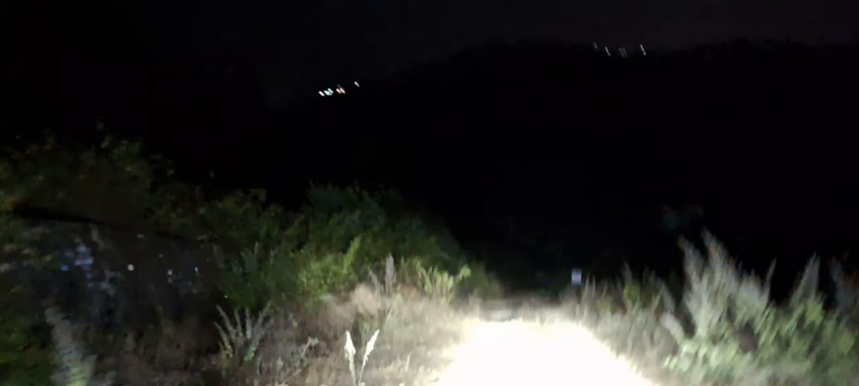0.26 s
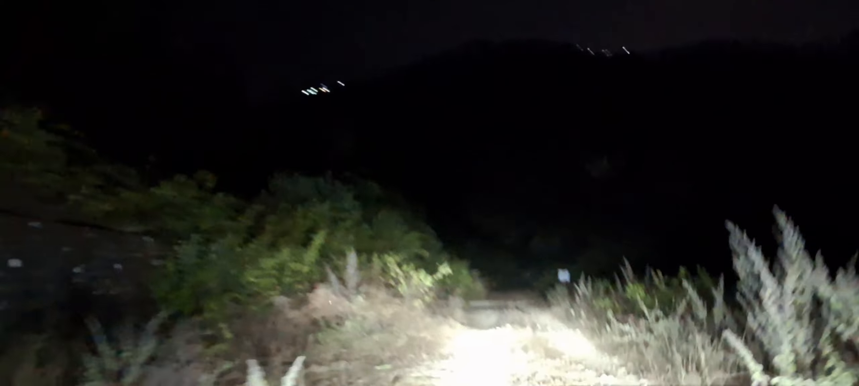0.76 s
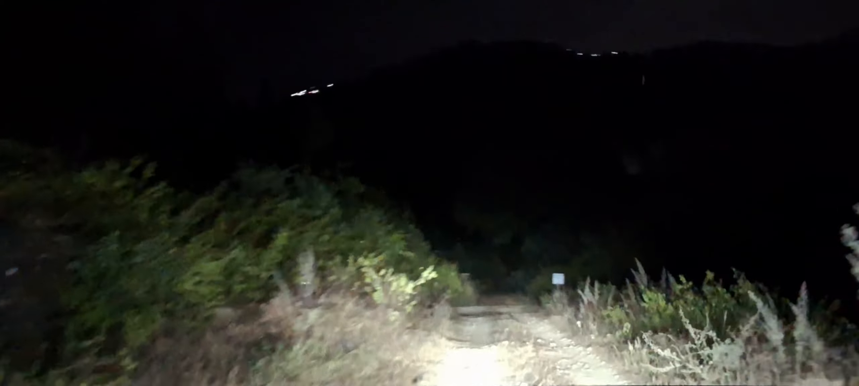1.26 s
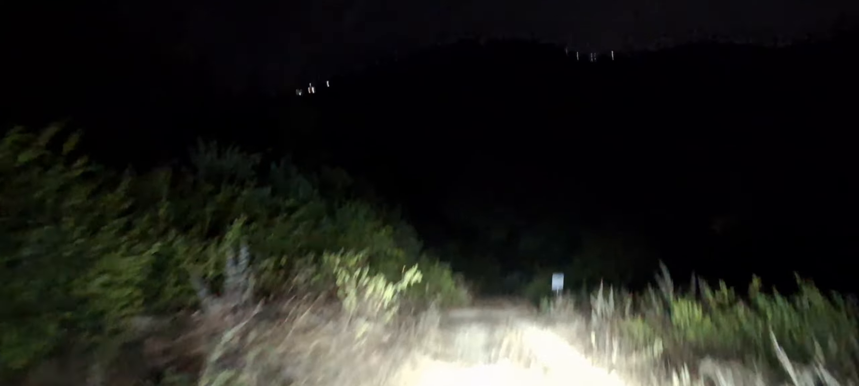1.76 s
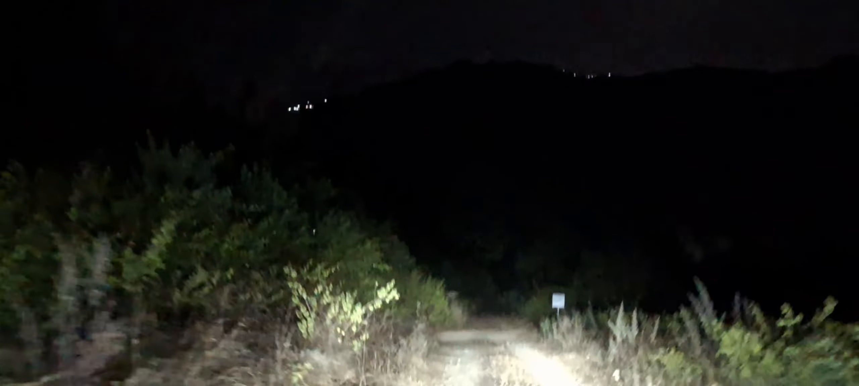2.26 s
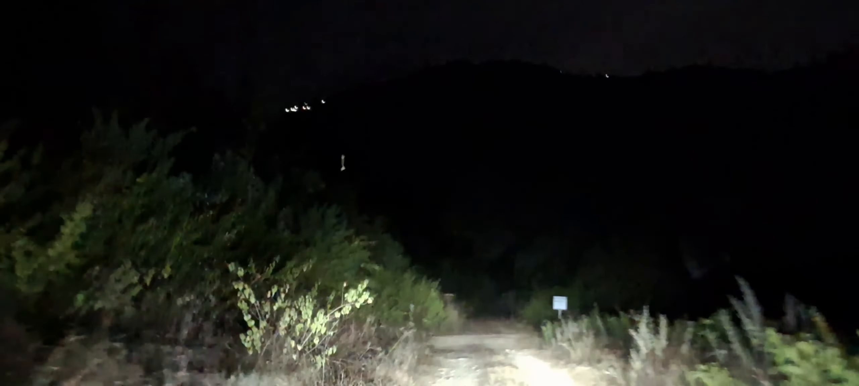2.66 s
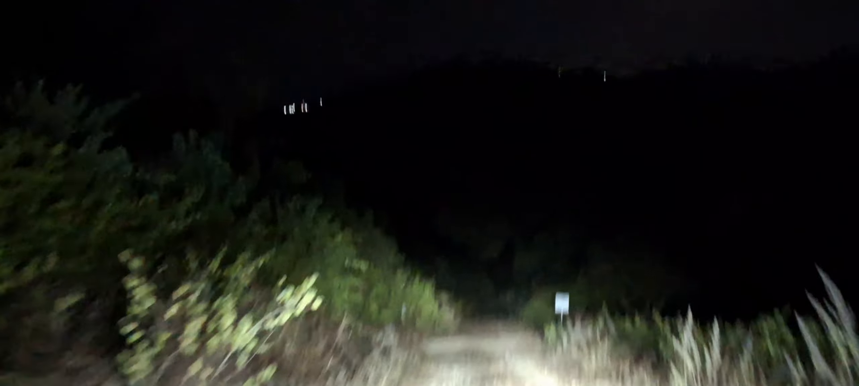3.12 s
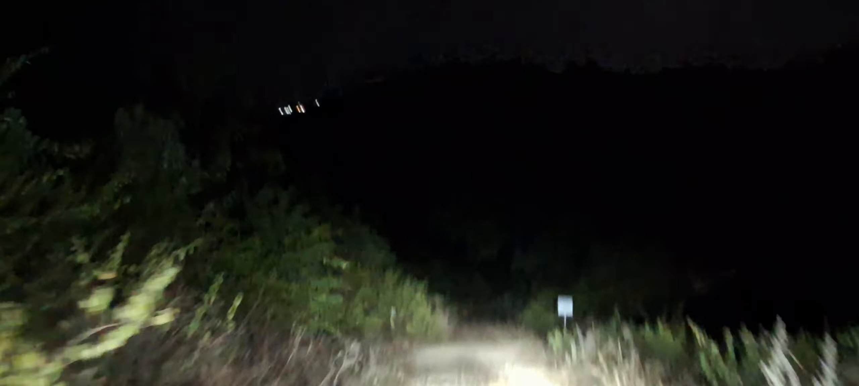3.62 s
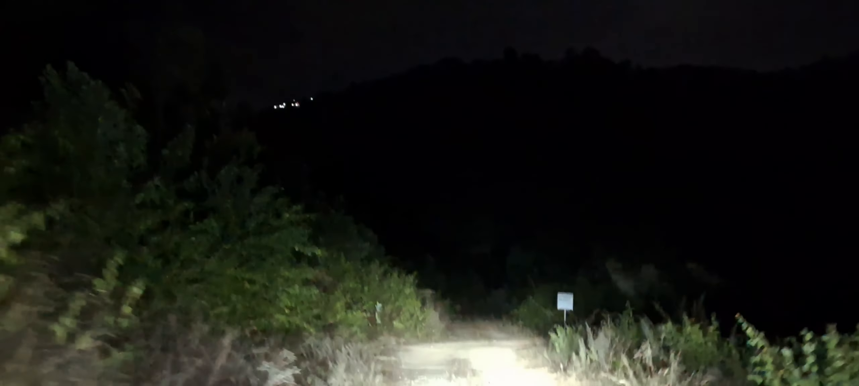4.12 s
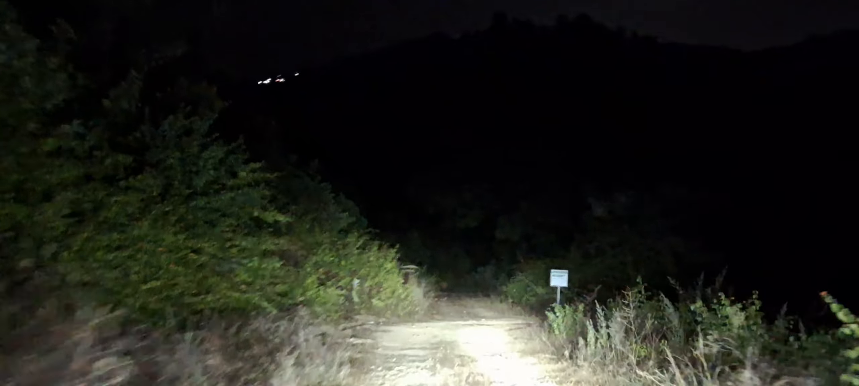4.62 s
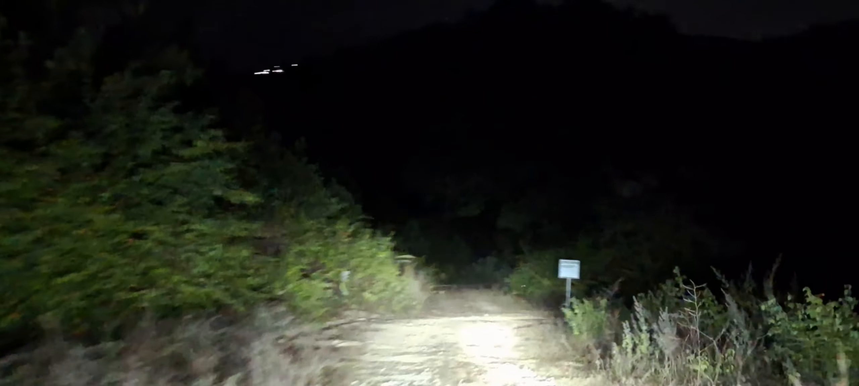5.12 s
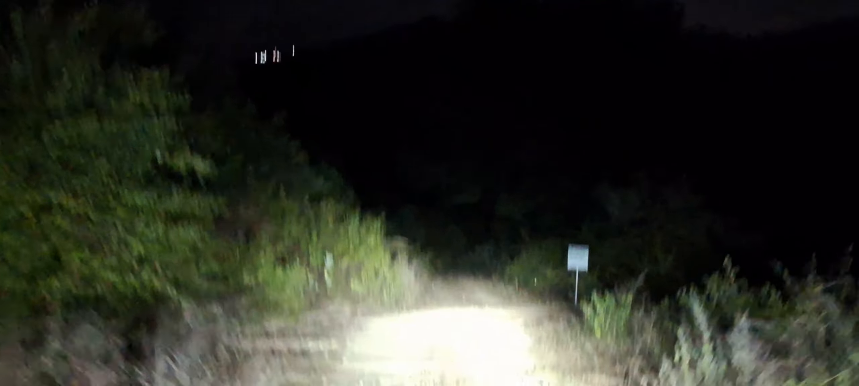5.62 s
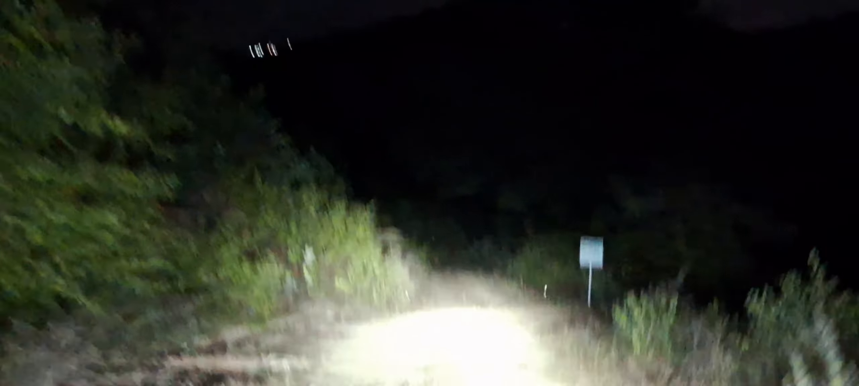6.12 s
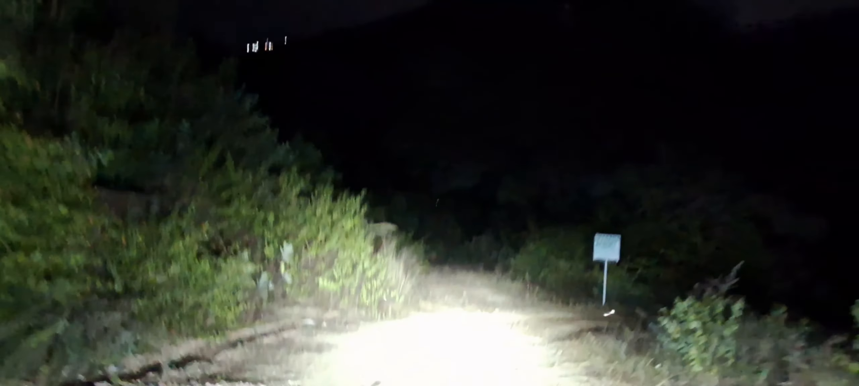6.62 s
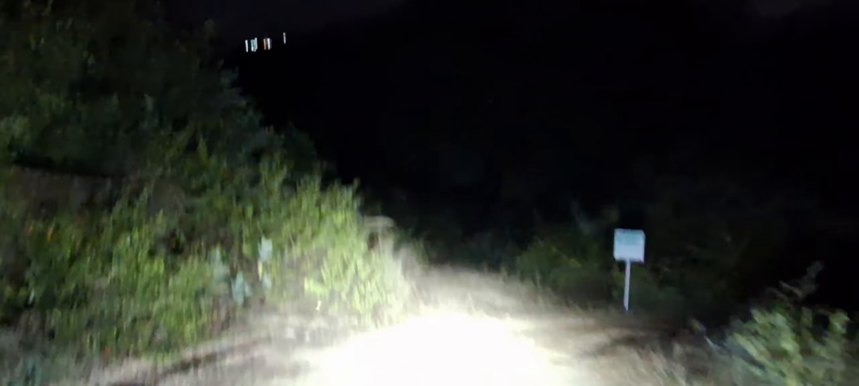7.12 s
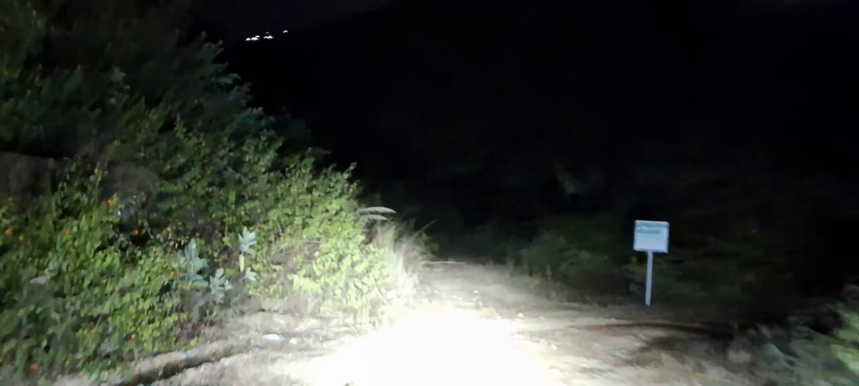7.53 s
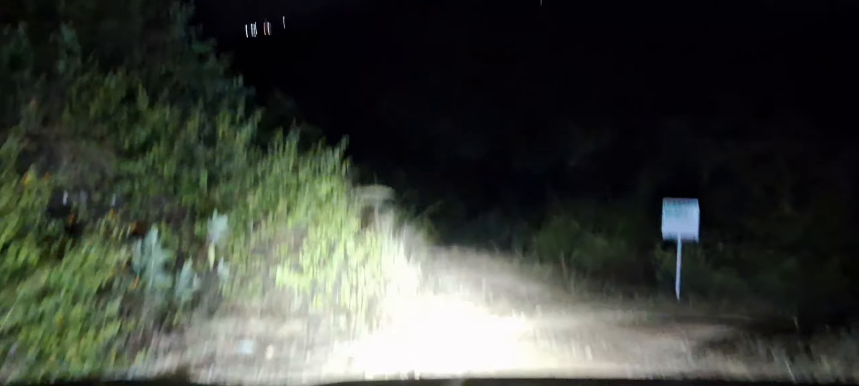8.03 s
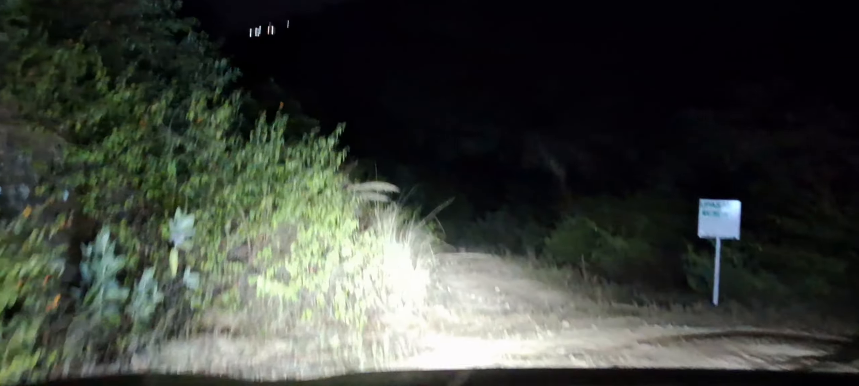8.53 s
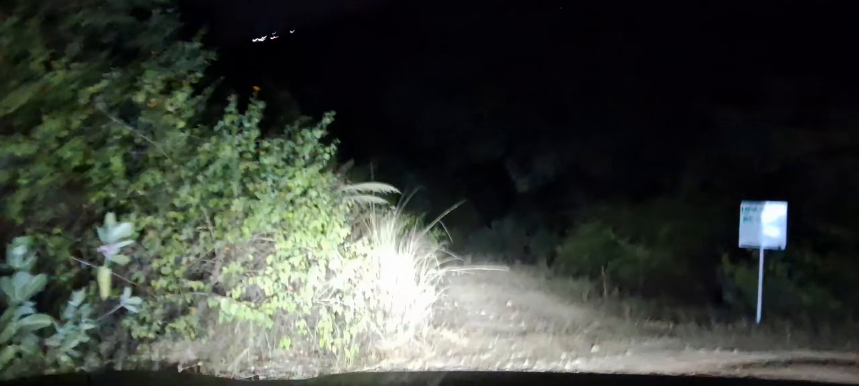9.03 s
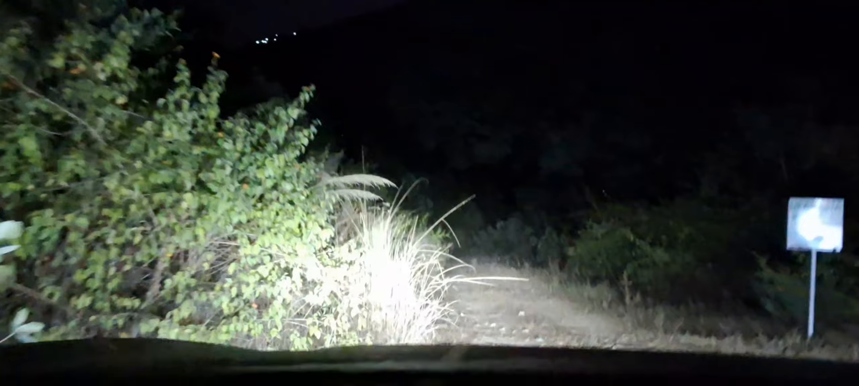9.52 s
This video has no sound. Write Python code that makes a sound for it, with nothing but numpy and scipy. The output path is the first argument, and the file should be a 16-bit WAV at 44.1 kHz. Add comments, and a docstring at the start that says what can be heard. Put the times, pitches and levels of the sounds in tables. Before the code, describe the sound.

Heard inside a car driving slowly over a stony dirt track. A deep, bumpy rumble of tyres and booming cabin air runs throughout, with rattling trim, knocking panels and pinging pebbles. Just after one second a stone scrapes and bangs hard underneath with a short ringing thud. Near eight seconds the car slows and the rumble eases; small metal chinks on the right finish it. Close stereo cabin microphones, bass centred.

```python
"""Inside a car crawling over a rough dirt track. From the start stones under the tyres excite resonances: axles thrum,
tyres drone, the cabin air booms, panels and roof drum, trim buzzes and rattles, pebbles ping and grit hisses.
Just after one second a stone scrapes and bangs along the underbody while the floor pan rings, falling in pitch.
The car slows near the end and the rolling sound eases; last, something small and metallic chinks on the right.
Two microphone ports a hand apart hear the bass alike and the treble with a small delay."""
import sys
import numpy as np
from scipy import signal
from scipy.fft import rfft, irfft, next_fast_len
from scipy.io import wavfile
from scipy.ndimage import uniform_filter1d, minimum_filter1d, map_coordinates

SR = 44100
rng = np.random.default_rng(int(sys.argv[2]) if len(sys.argv) > 2 else 0)


def transcribe(signal):
    """Save signal, clipped to [-1, 1], as a 16-bit WAV file at the path in sys.argv[1]."""
    frames = np.atleast_2d(signal).T
    limited = np.clip(frames, -1, 1)
    pcm = np.round(limited * 32767).astype(np.int16)
    wavfile.write(sys.argv[1], SR, pcm)


N = 430857

# low body sounds: (time [s], centre of the wandering boom noise [Hz, only its ratio to the mean counts],
# tyre drone level [dB], roof drumming level [dB])
BODY_SOUNDS = [(0.0, 118.3, -25, -31.5), (0.4, 121.9, -23, -24.5), (0.8, 122.5, -24.5, -28.5),
               (1.2, 120.9, -25.5, -28.5), (1.6, 119.8, -25, -23.5), (2.0, 119.3, -22.5, -32.5),
               (2.4, 124.2, -25.0, -26.5), (2.8, 119.1, -25.5, -27.5), (3.2, 125.6, -29, -30.5),
               (3.6, 122.3, -27.5, -32), (4.0, 123.2, -26.5, -29.5), (4.4, 124.9, -26, -27.9),
               (4.8, 121.3, -27.1, -29.5), (5.2, 117.6, -26, -33), (5.6, 122.8, -29, -27),
               (6.0, 121.2, -28.5, -30), (6.4, 123.2, -27.5, -30.5), (6.8, 121.6, -24, -28.5),
               (7.2, 121.4, -23, -29.0), (7.6, 120.8, -27.5, -31), (8.0, 124.9, -30, -33),
               (8.4, 120, -28.5, -37), (8.8, 120.5, -33, -40), (9.2, 121.2, -32.5, -37.5),
               (9.77, 120.4, -34, -41)]
# floor and door panel resonances: (frequency [Hz], bandwidth [Hz], level [dB])
PANEL_MODES = [(206.5, 28, 0), (275.2, 21.5, 2), (358.8, 40, -2), (470, 51.5, -5), (498, 78, -9.5),
               (703, 91, -14), (912, 110, -17), (1140, 100, -25.5)]
# colour of the loose trim: (frequency [Hz], spectral level [dB per Hz])
TRIM_COLOUR = [(710, -30), (1200, 4.5), (1410, -0.5), (1700, 0), (1880, -4), (2150, -2.5), (2910, -8),
               (4990, -13), (5850, -12), (7290, -21), (8200, -35), (9000, -43), (11700, -60.5),
               (19800, -120)]
# colour of grit on the body: (frequency [Hz], spectral level [dB per Hz])
GRIT_COLOUR = [(5000, -48.5), (8500, -11.5), (11400, -2), (13700, -2), (15700, -5)]


def amp(db):
    """Amplitude ratio from decibels."""
    return 10 ** (np.asarray(db) / 20)


def unit(x):
    """Normalises a signal to rms 1."""
    return x / np.sqrt(np.mean(x ** 2) + 1e-20)


def along(points, hz):
    """Interpolates (frequency, value) points on a logarithmic frequency axis."""
    f, v = np.transpose(points)
    return np.interp(np.log(hz + 1), np.log(f + 1), v)


def curves(rows):
    """Interpolates each column after the time linearly to one value per sample."""
    s, *cols = np.transpose(rows)
    return [np.interp(np.arange(N) / SR, s, c) for c in cols]


def swells(rows):
    """Superposes Gaussian swells, one for each bump, into one dB curve for each rise column."""
    s, length, *rises = np.transpose(rows)
    t = np.arange(0, N / SR + .01, .005)
    shape = np.exp(-4 * ((t[:, None] - s) / length) ** 2)
    return [np.interp(np.arange(N) / SR, t, shape @ rise) for rise in rises]


def wobble(rate):
    """A smooth random curve: a spline through normal deviates, rate knots a second."""
    knots = rng.standard_normal(int(N * rate / SR) + 4)
    return map_coordinates(knots, [np.arange(N) * rate / SR])


def filtered(x, response):
    """Linear filtering: the spectrum times a complex frequency response."""
    m = next_fast_len(N + SR // 2)
    return irfft(rfft(x, m) * response(np.fft.rfftfreq(m, 1 / SR)), m)[..., :N]


def modes(table):
    """Modal superposition: second-order resonances side by side, neighbours in opposite phase."""
    return lambda f: sum((-1) ** k * amp(db) * 1j * f * w / (c * c - f * f + 1j * f * w)
                         for k, (c, w, db) in enumerate(table))


def highpass(f, hz):
    """Smooth fourth-power roll-off towards the bass."""
    return 1 / (1 + (hz / (f + 1)) ** 4)


def lowpass(f, hz, power=4):
    """Smooth roll-off towards the treble, steeper for a higher power."""
    return 1 / (1 + (f / hz) ** power)


def low_modes(table, top_hz):
    """Resonances confined to the bass between two roll-offs."""
    return lambda f: modes(table)(f) * lowpass(f, top_hz) * highpass(f, 26)


def uneven(noise, depth_db):
    """Random modulation: the noise grows louder or softer unevenly in time and frequency."""
    z = signal.stft(noise, nperseg=256)[2]
    field = uniform_filter1d(rng.standard_normal(z.shape[1:]), size=4, axis=0)
    field = uniform_filter1d(field, size=6, axis=1)
    return unit(signal.istft(z * amp(depth_db * unit(field)), nperseg=256)[1][:, :N])


def shaped(envelope, response, uneven_db=0, blows=0):
    """Source and filter: two unrelated noises under an envelope, plus blows, in a unit-power colour."""
    scale = np.sqrt(np.mean(np.abs(response(np.fft.rfftfreq(SR, 1 / SR))) ** 2))
    noise = rng.standard_normal((2, N))
    if uneven_db:
        noise = uneven(noise, uneven_db)
    return filtered(envelope * noise + blows, response) / scale


def jolts(times, gains, t60, attack_s=0.0027):
    """Impulses convolved with a fast rise and an exponential decay give an envelope."""
    kicks = np.bincount((times * SR).astype(int), gains, N)[:N]
    t = np.arange(SR // 8) / SR
    decay = amp(-60 * t / t60) * (1 - np.exp(-t / attack_s))
    return np.abs(signal.fftconvolve(kicks, decay)[:N])


def steadied(pair, share):
    """Compression: evens out part of the noise's random swells, so that the level curves set the loudness."""
    power = uniform_filter1d(uniform_filter1d(pair[0] ** 2, size=3000), size=3000)
    swell = np.sqrt(np.abs(power) + 1e-12)
    even = pair / swell ** share
    return even * np.sqrt(np.mean(pair ** 2) / np.mean(even ** 2))  # rms is kept


def trim_halves(split_hz):
    """Power-complementary crossover: the dull and bright part of the trim's colour."""
    colour = lambda f: amp(along(TRIM_COLOUR, f))
    share = lambda f: lowpass(f, split_hz, 6)
    return [lambda f: colour(f) * np.sqrt(share(f)), lambda f: colour(f) * np.sqrt(1 - share(f))]


def gravel(depth_db):
    """Random pulse train: dense small stones, a few big among many weak, crushing slowly."""
    draw = rng.random((500, 2))
    times = (np.arange(len(draw)) + draw[:, 0]) / len(draw) * (N - 1) / SR
    gains = amp(-4 * np.log(draw[:, 1] + 0.0078) + depth_db)
    return 1 + jolts(times, gains, .07, attack_s=0.0041)


def road():
    """Forced vibration: the rough track drives each part of the body through its own resonances."""
    # steady rolling, easing as the car slows, before the bumps are added: (time [s], axle thrum level [dB],
    # cabin boom level [dB], panel drumming level [dB], grit hiss level [dB])
    rolling = [(0, -20.5, -20.5, -43.5, -74.5), (.45, -20.5, -17, -37, -65), (1.4, -22, -23, -39.5, -70.5),
               (2.05, -23.5, -18, -40.5, -69.5), (2.8, -22.5, -18.5, -38, -71),
               (3.2, -24.5, -20.5, -42.5, -74.5), (3.8, -23.5, -23, -45.5, -69.5),
               (4.7, -23.5, -23, -43.5, -73.5), (5.2, -22.5, -21, -42, -75),
               (6.35, -20.5, -17, -41.5, -70.5), (6.55, -27.5, -22.5, -44.5, -72.5),
               (6.9, -23.5, -22, -46.5, -73.5), (7.9, -25.5, -25, -44.5, -78), (8.75, -31, -27, -51, -76),
               (9.15, -28, -24, -48, -78.5), (9.77, -27, -30.5, -49.5, -68)]
    # bumps, stony spots and smooth patches under the wheels:
    # (time [s], length [s], rise of the crunch [dB], rise of the boom [dB], rise of the thrum [dB])
    bumps = [(0, 0.038, 12, 13.5, 18.5), (.27, 0.1, 0.5, 2.5, 0.5), (.37, 0.054, 2.5, -3, -5.5),
             (.52, 0.046, 4, 4, 3.5), (.68, 0.083, 0.5, 6.5, -2.5), (.85, 0.1, 2, 1, -1),
             (1.07, 0.15, 3, 4, 6.5), (1.31, 0.11, 1.5, 3, -6), (1.42, 0.21, -1.5, 1.5, 0.5),
             (1.57, 0.14, 3, 4, -2), (1.85, 0.054, -2, 1.5, 3), (2.02, 0.032, 4.5, 3.5, 5),
             (2.15, 0.11, 5.5, -5.5, 0.5), (2.24, 0.032, 4.5, 0, 8), (2.3, 0.13, -1, 2.5, 5),
             (2.68, 0.18, 2.5, 3.5, -1.5), (2.92, 0.091, 2.5, -3, 5.5), (3.26, 0.14, 3, 2.5, 6.5),
             (3.45, 0.16, 4.5, 2, 1), (3.72, 0.11, 6.5, 3, 2), (3.92, 0.27, 8.5, 10, 1),
             (4.12, 0.14, 7, 6.5, -2), (4.42, 0.14, 7.5, 5, 1.5), (4.62, 0.28, 2.5, 2.5, 1),
             (4.87, 0.16, 6, 2, 2.5), (5.04, .08, 3.5, 6, 1.5), (5.38, 0.065, 5.5, -7.5, 5),
             (5.54, 0.25, 5, 3, 1), (5.88, 0.14, 0.5, 4.5, -6), (6.01, 0.038, 7, 0, 4.5),
             (6.19, 0.064, 4, -3.5, -5.5), (6.27, 0.059, 4.5, -2, -4), (6.42, 0.089, 2, 0.5, 3),
             (6.75, 0.11, 3.5, 2, 9), (6.98, 0.38, 9, 4.5, -3), (7.26, 0.089, 7, 3, -5.5),
             (7.62, 0.12, 7, 5.5, -1), (7.92, 0.043, 5, 1, 6.5), (8.18, 0.074, 0, 3.5, -1),
             (8.26, 0.092, -2, 5, -1), (8.42, 0.16, 3.5, -0.5, -1.5), (8.59, 0.29, 6, 7.5, -1),
             (9.03, 0.091, 5, 0, 3.5), (9.17, 0.12, 3, 1.5, 5.5), (9.3, 0.11, 5.5, 0.5, 5.5)]
    typical_db = -41  # drumming on an ordinary stretch
    thrum_db, boom_db, drum_db, hiss_db = curves(rolling)
    _, drone_db, roof_db = curves(BODY_SOUNDS)
    crunch_rise, boom_rise, thrum_rise = swells(bumps)
    drum_db = drum_db + crunch_rise
    rough_db = drum_db - typical_db
    shared = gravel(-12) * amp(0.48 * wobble(13))

    def stones():
        """Common and independent excitation: shared stones times some of each part's own."""
        return unit(shared * gravel(-11) * amp(1.0 * wobble(16)))

    sound = axle_thrum(thrum_db + thrum_rise) + tyre_drone(drone_db) + cabin_boom(boom_db + boom_rise)
    sound = sound + panel_drumming(drum_db, rough_db, boom_rise, stones)
    sound = sound + trim_buzz(rough_db, hiss_db, stones) + pebbles(rough_db, count=6000)
    sound = sound + roof_drumming(roof_db, crunch_rise, boom_rise)
    return sound + grit_hiss(hiss_db, crunch_rise, stones)


def axle_thrum(level_db):
    """Mass-spring resonance: noise excites the axles' low modes."""
    # (frequency [Hz], bandwidth [Hz], level [dB])
    axle_modes = [(37, 25, -10), (51.6, 10, -1), (67.3, 14, -9)]
    return amp(level_db) * steadied(shaped(0.86, low_modes(axle_modes, 140)), 0.12)


def tyre_drone(level_db):
    """Structural resonance: noise excites the tyre walls, with its random swells partly evened out."""
    # (frequency [Hz], bandwidth [Hz], level [dB])
    wall_modes = [(81, 17, 4), (93.3, 11, -2)]
    return amp(level_db - 0.5) * steadied(unit(shaped(1, low_modes(wall_modes, 190))), 0.45)


def cabin_boom(level_db):
    """Cavity resonance: noise excites the modes of the enclosed air, and the narrow noise wanders slightly."""
    # air modes before the wandering: (frequency [Hz], bandwidth [Hz], level [dB])
    air_modes = [(103.9, 42, -7.5), (117.96, 20.3, 2.5), (141.7, 14.4, -3)]
    return amp(level_db) * steadied(wandering(shaped(0.85, low_modes(air_modes, 160))), 0.25)


def wandering(pair):
    """Time warping: the boom's pitch wanders slightly, as narrow noise does by chance."""
    flutter, knots_per_s = .035, 4  # random share added to the tabled wandering
    hz = curves(BODY_SOUNDS)[0]
    at = np.cumsum(hz / hz.mean() + flutter * wobble(knots_per_s))
    return np.array([np.interp(at * (N - 1) / at[-1], np.arange(N), x) for x in pair])


def panel_drumming(drum_db, rough_db, boom_rise, stones):
    """Plate resonance: stones drum on the panels; the big floor pan, lowest, also follows the boom."""
    pan_top_hz, pan_db = 304, -40.5  # pan level on an ordinary stretch
    pan_grows, pan_boom = 1.15, 0.49  # dB gained per dB of extra drumming and of boom rise
    panels = lambda f: modes(PANEL_MODES)(f) * highpass(f, 190) * lowpass(f, 1300)
    pan = lambda f: panels(f) * lowpass(f, pan_top_hz, 6)
    pan_level = amp(pan_db + pan_grows * rough_db + pan_boom * boom_rise)
    floor = pan_level * shaped(unit(stones() ** 1.1), pan)
    return floor + amp(drum_db) * shaped(unit(stones() ** 1.3), lambda f: panels(f) - pan(f))


def trim_buzz(rough_db, hiss_db, stones):
    """Amplitude modulation: stone impacts modulate a dull and a bright noise in the loose trim."""
    dull_db, bright_db = -59, -60  # on an ordinary stretch
    dull_grows, bright_grows = 1.0, 0.67  # dB gained per dB of extra drumming
    bright_with_grit, typical_grit_db = .4, -71  # dB gained per dB of hiss above the typical
    dull, bright = trim_halves(3300)
    sound = amp(dull_db + dull_grows * rough_db) * shaped(stones(), dull, uneven_db=1.5)
    bright_db = bright_db + bright_grows * rough_db + bright_with_grit * (hiss_db - typical_grit_db)
    return sound + amp(bright_db) * shaped(stones(), bright, uneven_db=2.0)


def pebbles(rough_db, count):
    """Damped free vibration: pebbles ping on the underbody, each a short ring at its own pitch and place."""
    level_db, grows = -65, 1  # on an ordinary stretch; dB gained per dB of extra drumming
    ring_cycles = 5.5  # cycles for a fall of 20 dB
    draw, t = rng.random((count, 4)), np.arange(200) / SR
    hz = 1100 * 6.2 ** draw[:, 1:2]
    size = amp(along(TRIM_COLOUR, hz) - 3.5 * np.log(draw[:, 2:3] + .03)) * np.sqrt(hz)
    decay = amp(-60 * t * hz / (3 * ring_cycles)) * (1 - np.exp(-t * hz))
    ping = size * decay * np.sin(2 * np.pi * hz * t)
    at = ((draw[:, :1] * N).astype(int) + np.arange(len(t))).ravel()
    turn = 2 * np.pi * draw[:, 3:]  # place: how the ping divides between the two signals
    pair = [np.bincount(at, (ping * g).ravel(), N)[:N] for g in (np.cos(turn), np.sin(turn))]
    return amp(level_db + grows * rough_db) * unit(np.array(pair))


def roof_drumming(level_db, crunch_rise, boom_rise):
    """Plate resonance: noise excites two low roof modes, following the rises of crunch and boom."""
    # (frequency [Hz], bandwidth [Hz], level [dB])
    roof_modes = [(153, 13, -1), (176.4, 28.2, 1.5)]
    per_crunch, per_boom = 0.62, 0.38  # dB gained per dB of each rise
    level = amp(level_db - 2.5 + per_crunch * crunch_rise + per_boom * boom_rise)
    return level * unit(shaped(1, low_modes(roof_modes, 270)))


def grit_hiss(level_db, crunch_rise, stones):
    """Filtered noise: the hiss of grit is treble noise, with a random unevenness in time and frequency."""
    grows = 0.65  # dB gained per dB of crunch
    hiss = shaped(unit(stones() ** 1.4), lambda f: amp(along(GRIT_COLOUR, f)), uneven_db=-2.5)
    return amp(level_db + grows * crunch_rise) * hiss


def trim_rattles():
    """Transient excitation: each jolt starts a short decaying noise in the trim, dull and bright."""
    # (time [s], dull part level [dB], bright part level [dB])
    bursts = [(0.1155, -45.5, -57), (0.1501, -62, -50), (0.2634, -36, -68), (0.5165, -49, -46),
              (0.5872, -35.5, -51), (0.617, -39, -53.5), (0.75, -41.5, -44), (0.841, -37, -62),
              (1.309, -57, -43), (1.5307, -48.5, -63.5), (1.9173, -51, -44.5), (2.145, -45, -43.5),
              (2.239, -44.5, -48), (2.55, -45, -42.5), (2.601, -43, -43), (2.7127, -42.5, -61),
              (2.993, -65, -46), (3.1626, -44, -68), (3.3663, -40, -49), (3.478, -43.5, -61),
              (3.7125, -44.5, -47), (3.8254, -58.5, -43), (4.0432, -51, -59.5), (4.1017, -49, -58),
              (4.345, -43, -57), (4.3902, -57, -65), (4.6057, -43, -42.5), (4.8034, -44.5, -57),
              (4.852, -61, -60), (4.994, -45, -51), (5.238, -48.5, -74), (5.332, -52, -51),
              (5.7064, -51.5, -71), (6.005, -39, -46), (6.2697, -54.5, -45.5), (6.401, -51, -60.5),
              (6.8587, -40, -55), (6.9622, -48, -62), (6.993, -44, -65), (7.0223, -46.5, -59),
              (7.0574, -41, -47.5), (7.2497, -38.5, -57), (7.5911, -55, -60), (8.39, -63, -49.5),
              (8.8684, -69, -54), (8.972, -67, -49), (9.0124, -66, -51), (9.072, -67, -49),
              (9.3644, -51, -60), (9.3974, -59, -47), (9.5274, -66, -49.5), (9.5604, -65, -49),
              (9.698, -49, -45)]
    s, dull_db, bright_db = np.transpose(bursts)
    dull, bright = trim_halves(4600)
    low_part = shaped(jolts(s, amp(dull_db), .055, attack_s=.0025), dull)
    return low_part + shaped(jolts(s, amp(bright_db), 0.055, attack_s=0.0055), bright)


def grit_ticks():
    """Transient excitation: the loudest grit thrown against the body ticks as short treble noise."""
    # (time [s], level [dB])
    hits = [(.1166, -65.5), (.48, -57.5), (.5219, -54.5), (.616, -50), (0.9194, -63.5), (1.0837, -46.5),
            (1.27, -59), (1.528, -66.5), (1.921, -48.5), (1.987, -55.5), (2.1476, -44), (2.3261, -66.5),
            (2.992, -60), (3.377, -62), (3.463, -59.5), (3.71, -58.5), (3.7556, -53), (3.8276, -56.5),
            (3.8925, -57), (3.9612, -59.5), (4.3902, -59.5), (4.806, -50.5), (4.8543, -49.5), (5.365, -58),
            (5.4967, -54), (6.0076, -51.5), (6.8874, -55.5), (7.0634, -56), (7.251, -57)]
    s, db = np.transpose(hits)
    return shaped(jolts(s, amp(db), 0.06, attack_s=.008), lambda f: amp(along(GRIT_COLOUR, f)))


def panel_knocks():
    """Impulse response: stones and suspension knock the panels with a sharp blow and a rumble."""
    # (time [s], level [dB])
    hits = [(0.253, -23), (0.483, -45), (0.543, -45), (0.582, -26), (0.845, -25.5), (1.021, -52),
            (1.084, -19), (1.499, -33), (1.59, -30), (1.994, -40.5), (2.107, -34.5), (2.18, -33),
            (2.233, -37), (2.654, -28), (2.816, -30.5), (3.026, -36.5), (3.374, -42), (3.48, -31.5),
            (3.702, -36.5), (3.913, -36.5), (3.96, -29.5), (4.048, -41), (4.098, -34), (4.279, -41),
            (4.425, -31.5), (4.529, -42.5), (4.602, -41), (4.835, -34.5), (5.114, -51), (5.216, -35),
            (5.311, -46), (5.66, -34.5), (5.706, -32.5), (5.776, -31), (6.004, -30), (6.075, -33),
            (6.383, -34.5), (6.459, -39), (6.756, -29.5), (6.861, -29), (6.961, -33), (6.996, -29),
            (7.256, -30), (7.91, -39.5), (8.16, -36.5), (8.39, -35.5), (8.45, -46), (8.58, -38.5),
            (9.015, -38)]
    blow_db = 17  # added to the level of the one-sample blow
    s, db = np.transpose(hits)
    blow = np.bincount((s * SR).astype(int), amp(db + blow_db), N) * np.array([[1], [.5]])
    colour = lambda f: modes(PANEL_MODES)(f) * highpass(f, 450) * lowpass(f, 1500)
    return shaped(jolts(s, amp(db + 1), 0.036, attack_s=0.0014), colour, blows=blow)


def loud_pings():
    """Beating partials: each loud pebble on the underbody rings briefly at three close pitches."""
    # (time [s], level [dB], frequency [Hz])
    hits = [(.262, -37, 1460), (.262, -49, 2330), (.517, -44, 3100), (1.311, -47, 5430), (1.563, -55, 6460),
            (1.92, -53, 5770), (2.145, -55, 6120), (2.232, -48, 2800), (2.232, -57, 3960),
            (3.369, -57, 3470), (3.826, -55, 5680), (3.908, -46, 2200), (3.96, -41, 1550),
            (4.016, -56, 2200), (4.051, -49, 2250), (4.1, -49, 2190), (4.285, -47, 1550),
            (4.344, -54, 4130), (4.39, -49, 2200), (4.605, -53, 4130), (4.605, -50, 5200),
            (5.364, -58, 6290), (6.004, -49, 2240), (6.009, -54.5, 4130), (6.244, -56, 5510),
            (6.859, -57, 5940), (7.058, -54, 3960), (7.248, -56, 2670), (7.609, -54, 4220),
            (8.391, -59, 5940), (8.972, -58, 6120), (9.365, -55, 2760), (9.4, -54, 4140),
            (9.402, -54, 2800), (9.455, -65, 6000)]
    ring_cycles, spread = 40, .05  # cycles for a fall of 20 dB; relative spacing of the partials
    out, t = np.zeros((2, N + SR)), np.arange(SR // 20) / SR
    for (s, db, hz), draw in zip(hits, rng.random((len(hits), 7))):
        ring = 0
        for k in range(3):
            partial_hz = hz * (1 + spread * (k - 1 + draw[k] - .5))
            ring = ring + np.sin(2 * np.pi * partial_hz * t + draw[3 + k])
        ring = ring * amp(db - 3.5 - 60 * t * hz / (3 * ring_cycles)) * (1 - np.exp(-t / .0015))
        out[:, round(s * SR):][:, :len(t)] += ring * [[np.cos(draw[6])], [np.sin(draw[6])]]
    return out[:, :N]


def floor_pan():
    """Damped oscillation of falling pitch: the pan rings around the stone and on the roughest bumps."""
    # (time [s], level [dB], starting frequency [Hz], sag [Hz per s], decay by 60 dB [s])
    thuds = [(1.021, -30, 700, 300, 0.055), (1.034, -18.5, 352, 2154, 0.15), (1.084, -6, 374, 2450, 0.054),
             (1.086, -28, 650, 600, .04), (1.09, -27.5, 1177, 900, .04), (1.099, -21, 960, 900, 0.052),
             (3.92, -29, 284, 100, 0.13), (4.05, -25, 289, 100, 0.17), (4.109, -28.5, 288, 100, .14),
             (4.42, -30.5, 284, 100, .14)]
    t, ring = np.arange(N) / SR, 0
    for start, db, hz, sag, t60 in thuds:
        age = np.clip(t - start, 0, .1)
        swing = np.sin(2 * np.pi * (hz - sag * age / 2) * age) * (t - start < .1)
        ring = ring + amp(db - 60 * age / t60) * (1 - np.exp(-age / 0.0045)) * swing
    return ring * [[1], [0]]  # only the part that the ports share


def stone():
    """Impact excitation of a shell: a scrape, then four quick blows on the underbody, ever duller."""
    # (time [s], level [dB], length [s], treble over the body [dB])
    contacts = [(1.07, -45.5, 0.044, 5.5), (1.083, -23, 0.0067, 3), (1.09, -23, 0.0069, 2),
                (1.096, -25.5, 0.0072, -4), (1.102, -25, 0.008, -5)]
    # colour of the bang: (frequency [Hz], spectral level [dB per Hz])
    bang_colour = [(120, -26), (200, 0), (962, -14.5), (1200, -13), (1310, -30.5), (1460, -20), (2190, -21),
                   (2680, -23.5), (3100, -26), (4000, -25.5), (5980, -25.5), (8460, -45.5), (15700, -57)]
    # underbody resonances: (frequency [Hz], bandwidth [Hz], rise [dB])
    shell = [(641, 69, 1.5), (970, 66, 5.5), (1410, 80, 5.5), (2330, 130, -4), (3350, 180, 4),
             (3940, 330, 7), (5120, 250, -0.5), (5900, 300, 0.5)]
    t = np.arange(N) / SR

    def blows(treble):
        return sum(amp(db + treble * over) * np.exp(-((t - s) / length) ** 2 * 4)
                   for s, db, length, over in contacts)

    def colour(f):
        rise = sum(db / (1 + (2 * (f - c) / w) ** 2) for c, w, db in shell)
        return amp(along(bang_colour, f) + rise) * highpass(f, 450)

    share = lambda f: lowpass(f, 2000)
    s, db, _, _ = np.transpose(contacts)
    tail = jolts(s, amp(db - 20.5), 0.2)
    body = shaped(blows(0) + tail, lambda f: colour(f) * share(f))
    return body + amp(-7) * shaped(blows(1) + tail, lambda f: colour(f) * (1 - share(f)))


def chinks():
    """Modal ringing: every contact rings the metal's modes at new strengths and scrapes briefly."""
    # (time [s], level [dB])
    contacts = [(9.633, -54), (9.669, -52), (9.678, -52), (9.69, -51), (9.698, -61), (9.704, -62),
                (9.716, -50), (9.736, -52), (9.75, -49)]
    # modes, varied at each contact: (frequency [Hz], level [dB], decay by 60 dB [s])
    metal = [(2340, -20, .04), (2750, -8, .05), (2780, -12, .045), (2880, -9, 0.041), (3004, -10, .05),
             (3380, -6.5, 0.11), (3460, -13, .05), (3700, -16, .04), (3900, -15, .04), (4100, -11, .04)]
    out, t = np.zeros(N + SR), np.arange(SR // 4) / SR
    for s, db in contacts:
        ring = 0
        for hz, level, t60 in metal:
            decay = amp(db + level + rng.normal(0, 2.5) - 60 * t / t60)
            mode_hz = hz * (1 + rng.normal(0, .003))
            ring = ring + decay * np.sin(2 * np.pi * mode_hz * t + rng.uniform(0, 2 * np.pi))
        out[round(s * SR):][:len(t)] += ring * (1 - np.exp(-t / 0.0011))
    s, db = np.transpose(contacts)
    colour = lambda f: amp(along(TRIM_COLOUR, f)) * highpass(f, 2700) * lowpass(f, 4500)
    scrape = shaped(jolts(s, amp(db - 3.5), 0.093), colour)
    return (out[:N] + scrape) * amp([[-3], [3]])  # left, right


def ports(pair):
    """Interaural-like cues: mixing sets the correlation of the ports, then a delay and tilt part them."""
    # (frequency [Hz], correlation of the ports before the delay [1])
    alike = [(25, 0.96), (60, 1), (130, .97), (290, 0.79), (640, 0.55), (1200, 0.31), (3000, 0.029),
             (7000, 0.041), (15000, 0.2)]
    # (frequency [Hz], time by which left lags [s])
    lag = [(60, 0), (600, 0), (1080, .00045), (1380, .00033), (1890, .00026), (2930, .00037),
           (15000, .0003)]
    # (frequency [Hz], left over right [dB])
    lean = [(60, 0), (140, 1.5), (210, 3.5), (330, .5), (770, -.5), (1170, .5), (1790, 0), (4190, -3.5),
            (9810, -2.5), (15000, -.5)]
    turn = lambda hz: np.arccos(np.clip(along(alike, hz), -1, 1)) / 2
    mid, side = filtered(pair, lambda hz: np.array([np.cos(turn(hz)), np.sin(turn(hz))]))
    skew = lambda hz: amp(along(lean, hz) / 2) * np.exp(-1j * np.pi * hz * along(lag, hz))
    both = np.array([mid + side, mid - side])
    return filtered(both, lambda hz: np.array([skew(hz), 1 / skew(hz)]))


def scene():
    """Superposition of all sources at the two ports; the chinks have their own left-right balance."""
    hits = trim_rattles() + grit_ticks() + panel_knocks() + loud_pings()
    return ports(road() + hits + floor_pan() + stone()) + chinks()


def record(dry):
    """Peak limiting and band limiting: the largest booms are held down and the top is cut off."""
    ceiling, hold_s, top_hz = .6, .03, 15850  # ceiling as a share of full scale
    need = ceiling / np.maximum(np.abs(dry).max(axis=0), ceiling)
    hold = round(hold_s * SR)
    gain = uniform_filter1d(minimum_filter1d(need, size=hold), size=hold)
    return filtered(dry * gain, lambda hz: hz < top_hz)


dry = scene()
out = record(dry)
transcribe(out)
```